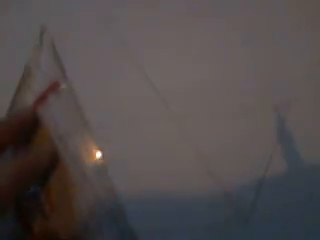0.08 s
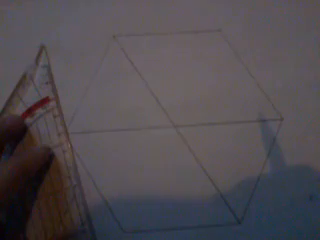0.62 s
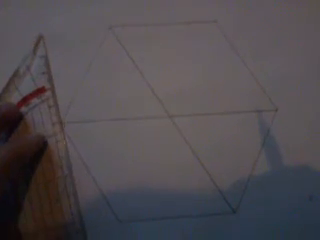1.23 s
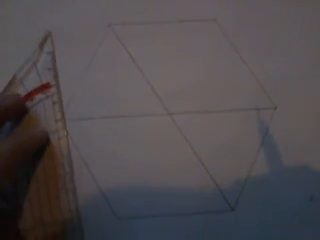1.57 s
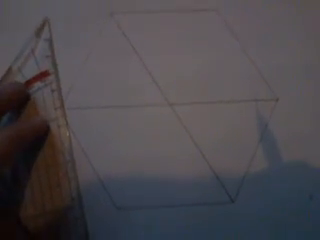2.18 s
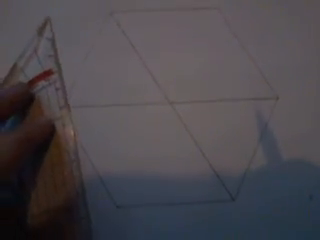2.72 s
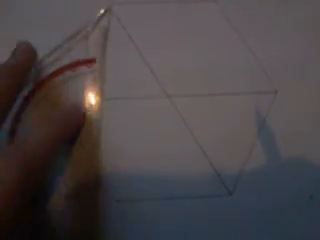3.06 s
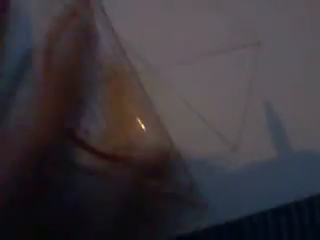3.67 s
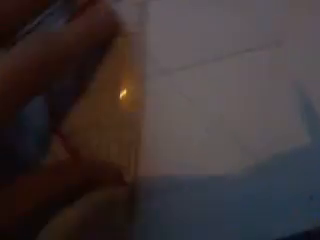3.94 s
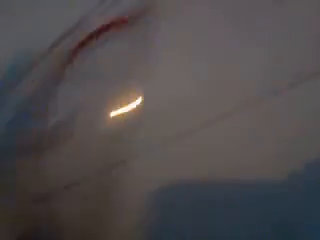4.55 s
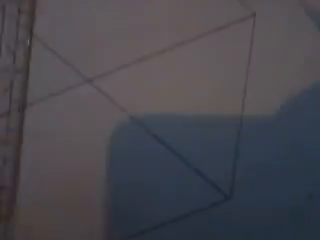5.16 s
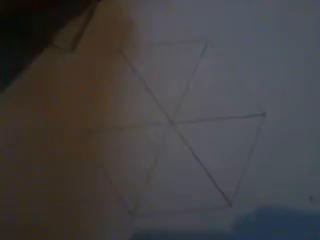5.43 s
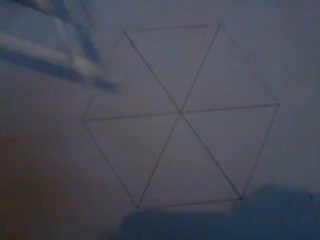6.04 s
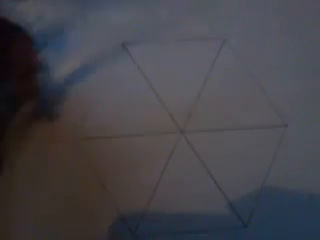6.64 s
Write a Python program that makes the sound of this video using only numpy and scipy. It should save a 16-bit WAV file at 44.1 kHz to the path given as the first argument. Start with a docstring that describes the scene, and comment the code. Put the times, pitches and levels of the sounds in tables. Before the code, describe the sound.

A plastic set square scrapes and slides over paper, with ticks, brief squeaks and a loud rattling knock, over a faint fan.

```python
"""A small fan whirs in a quiet room. Close to a small microphone, a plastic set square slides face down
on paper, rubbing over the fibres and catching with little ticks. At 1.5 s an edge digs in and knocks;
fingers drag on the sheet. Near 3 s a corner squeaks, then the tip squeals as the square is tilted up.
At 5 s it is knocked down, overloads the input and rattles, then skims back on its edge."""
import sys
import numpy as np
from scipy import signal
from scipy.fft import rfft, irfft
from scipy.io import wavfile

SR = 44100
rng = np.random.default_rng(int(sys.argv[2]) if len(sys.argv) > 2 else 0)


def generate_wav(sig):
    """Save sig (samples, or channels by samples) to the path in sys.argv[1] as 16-bit PCM at SR."""
    pcm = np.round(np.clip(np.atleast_2d(sig).T, -1, 1) * 32767).astype(np.int16)
    wavfile.write(sys.argv[1], SR, pcm)


N = 298998
TIME = np.arange(N) / SR


def from_db(db):
    return 10 ** (np.asarray(db) / 20)


def unit_rms(x):
    return x / np.sqrt(np.mean(x ** 2) + 1e-20)


def butter(x, hz, kind, order=2):
    return signal.sosfilt(signal.butter(order, hz, kind, fs=SR, output="sos"), x)


def steep_lowpass(x, hz):
    return signal.sosfilt(signal.ellip(10, .1, 80, hz, fs=SR, output="sos"), x)


def coloured(x, spectrum):
    """Shape x by (freq_hz, gain_db) points, rolled off below the first; rms 1."""
    hz, db = np.transpose(spectrum)
    bins_hz = np.maximum(np.arange(N // 2 + 1) * SR / N, 1)
    low_cut = 1 / (1 + (hz[0] / bins_hz / 2) ** 4)
    gain = from_db(np.interp(np.log(bins_hz), np.log(hz), db))
    return unit_rms(irfft(rfft(x) * low_cut * gain, N))


def resonant(x, modes, alternate=True):
    """Parallel resonators, by default of alternating sign; rms 1."""
    out = 0
    for k, (hz, width_hz, db) in enumerate(modes):
        radius = np.exp(-np.pi * width_hz / SR)
        feedback = [1, -2 * radius * np.cos(2 * np.pi * hz / SR), radius ** 2]
        sign = (-1) ** k if alternate else 1
        out += sign * from_db(db) * signal.lfilter([1 - radius, 0, radius - 1], feedback, x)
    return unit_rms(out)


def drift(rate_hz):
    """Random wander; rms 1."""
    return unit_rms(np.interp(TIME * rate_hz, np.arange(N), rng.standard_normal(N)))


def swell(start_s, rise_s):
    """Contact envelope: peaks at 1 after rise_s, then decays."""
    age = np.clip((TIME - start_s) / rise_s, 0, 20)
    return age * np.exp(1 - age) * (age < 20)


def friction(slips_per_s, spread_db, judder_db):
    """Paper fibres let go in tiny uneven slips, bunched by the judder of the hand."""
    sizes = from_db(spread_db * np.minimum(rng.exponential(1, N), 4)) * rng.standard_normal(N)
    slips = rng.random(N) < slips_per_s / SR
    return sizes * slips * from_db(judder_db * drift(260))


def bursts(events, width, crack_db):
    """Brief clusters of contacts: a broad resonance over a wider crack."""
    out, noise = np.zeros(N), rng.standard_normal(N)
    for start_s, db, hz, rise_s in events:
        span = slice(int(start_s * SR), int((start_s + 20 * rise_s) * SR))
        envelope = swell(start_s, rise_s)[span]
        ring = unit_rms(butter(noise[span], [hz / (1 + width), hz * (1 + width)], "band"))
        crack = unit_rms(butter(noise[span], [hz / 4, min(2 * hz, 7000)], "band", order=3))
        burst = unit_rms(envelope * (ring + from_db(crack_db) * crack))
        out[span] += from_db(db) * burst * np.sqrt(np.mean(envelope ** 2))
    return out


# Room noise: freq_hz, gain_db
ROOM_SPECTRUM = [(20, 15.5), (55, -21), (100, -26), (180, -11.5), (270, -6), (340, 3.5), (460, -0.5),
                 (800, 2), (1050, 1.5), (1400, -2.5), (2600, -3.5), (4500, -3.5), (6300, 0), (7300, -3.5)]


def room_hiss(level_db=-56.5):
    """Steady noise floor."""
    noise = coloured(rng.standard_normal(N), ROOM_SPECTRUM)
    return from_db(level_db) * unit_rms(butter(noise, 8200, "low", order=6))


# Fan tones: pitch_hz, rms_db
FAN_TONES = [(349.9, -82), (780.6, -74), (866.7, -80.5), (952.8, -67.5), (995.9, -75.5), (1039, -65),
             (1125, -72), (1319, -95.5)]


def fan(speed_waver=0.0011):
    """Cooling fan: all tones waver together with its speed."""
    rotor_s = TIME + speed_waver * np.cumsum(drift(7.1)) / SR
    return sum(np.sqrt(2) * from_db(db) * np.sin(2 * np.pi * (hz * rotor_s + rng.random()))
               for hz, db in FAN_TONES)


def reflections(x, wet_db=-30, t60_s=0.24):
    """Desk and nearby walls return a short, faint tail."""
    age_s = TIME[:SR // 3]
    tail = rng.standard_normal(len(age_s)) * from_db(-60 * age_s / t60_s) * (age_s > .003)
    return from_db(wet_db) * signal.fftconvolve(x, tail / np.sqrt(np.sum(tail ** 2)))[:N]


# Desk thuds: start_s, level_db, centre_hz, rise_s
DESK_THUDS = [(.828, -61, 270, 0.0067), (1.075, -62, 222, 0.0033), (1.591, -31, 138, 0.00077),
              (2.64, -44, 347, 0.015), (4.967, -37.5, 366, 0.0032), (4.977, -21, 220, 0.0011),
              (5.2, -35, 346, 0.0026), (5.79, -52.5, 240, 0.0038), (5.865, -52, 282, 0.0082)]


def thuds():
    """The desk's dull answer to a contact."""
    return bursts(DESK_THUDS, width=0.33, crack_db=-43)


# Catches and taps: start_s, level_db, centre_hz
PAPER_TICKS = [(0.3734, -31, 2340), (.409, -31, 2200), (0.4525, -25, 5200), (.693, -39.5, 5260),
               (1.126, -38, 2100), (1.144, -30.5, 1880), (1.163, -38, 2280), (1.478, -38, 4600),
               (1.557, -29.5, 4530), (1.574, -14, 4300), (1.5895, -8.5, 4200), (1.5916, -14, 1900),
               (1.6308, -12.5, 6260), (1.6835, -12, 4300), (2.3586, -36.5, 3740), (2.6356, -13.5, 5820),
               (2.732, -43.5, 5500), (3.5525, -43, 6800), (4.1987, -44, 6260), (4.2372, -42.5, 6060),
               (4.9632, -28.5, 5700), (4.976, -20.5, 5900), (5.1979, -12, 5600), (5.2007, -13, 5700),
               (5.7365, -23, 5540), (5.993, -46.5, 5470), (6.492, -44, 4960), (6.6082, -29, 3360)]


def ticks(rise_s=.0012):
    """Plastic catches on paper, equally fast every time."""
    return bursts([(*tick, rise_s) for tick in PAPER_TICKS], width=0.25, crack_db=-10)


# Landings: start_s, chatter_db, ring_db, chatter_t60_s
LANDINGS = [(4.965, -22, -29.5, 0.11), (4.98, -25, -19, 0.15), (5.203, -25.5, -51, 0.096)]
# Modes of the loose square: pitch_hz, level_db, t60_s
SQUARE_MODES = [(958, -16.5, 0.18), (1460, -8, 0.093), (1685, -3, 0.17), (1917, -10, 0.143),
                (2920, -20, 0.18), (3300, -5, 0.034), (3903, -30.5, 0.25), (4480, -26, 0.25),
                (5140, -22.5, 0.2), (6210, -25, 0.13), (6051, -26, 0.15), (6340, -18.5, 0.268)]


def rattles():
    """After landing, the square rings in its modes and buzzes against the sheet."""
    spectrum_hz_db = [(200, -13), (700, 2.5), (1100, 7.5), (1600, -3.5), (2500, -3), (4000, -1),
                      (6200, 2.5), (7500, 3), (9000, -28.5)]
    chatter = coloured(friction(4600, spread_db=1.65, judder_db=2.01), spectrum_hz_db)
    out = np.zeros(N)
    for start_s, chatter_db, ring_db, chatter_t60_s in LANDINGS:
        start = int(start_s * SR)
        age_s = TIME[:min(SR // 2, N - start)]
        span = slice(start, start + len(age_s))
        ring = sum(from_db(db - 60 * age_s / t60_s) * np.sin(2 * np.pi * (hz * age_s + rng.random()))
                   for hz, db, t60_s in SQUARE_MODES)
        buzz = from_db(chatter_db - 60 * age_s / chatter_t60_s) * chatter[span]
        out[span] += from_db(ring_db) * ring + buzz
    return out


# Blows through the sheet: start_s, level_db, pitch_hz, rise_s
DESK_KNOCKS = [(1.582, -22.5, 1020, 0.0014), (1.5928, -2.5, 746, 0.00096), (2.0597, -27.5, 630, 0.0007),
               (2.0884, -27, 746, 0.00067), (2.385, -25.5, 1000, 0.00023), (2.6369, -30, 460, 0.0019),
               (4.9666, -13.5, 1210, 0.00056), (4.978, 5.5, 1375, 0.00079), (4.99, -17.5, 1130, 0.00069),
               (4.9973, -18.5, 1580, 0.0012), (5.2012, -15.5, 1295, 0.0014), (6.5697, -5.5, 807, 0.00053)]


def knocks(stiffening=0.48):
    """Square and desk give a few damped swings, higher in pitch while the contact is tight."""
    out = np.zeros(N)
    for start_s, db, hz, rise_s in DESK_KNOCKS:
        age_s = np.maximum(TIME - start_s, 0)
        relaxed = 1 - np.exp(-np.minimum(age_s / rise_s, 20))
        cycles = hz * (age_s + stiffening * rise_s * relaxed)
        out -= from_db(db) * swell(start_s, rise_s) * np.sin(2 * np.pi * cycles)
    return out


# Singing of the plate: start_s, end_s, level_db, pitch_hz
SUNG_TONES = [(0.389, 0.482, -29, 5300), (0.49, 0.626, -45.5, 1650), (1.158, 1.294, -50, 2130),
              (5.092, 5.132, -42, 1690), (5.093, 5.128, -43, 1920), (6.038, 6.28, -35.5, 4850)]


def singing(width_hz=230):
    """One narrow resonance of the rubbed plate swells and fades."""
    out, noise = np.zeros(N), rng.standard_normal(N)
    for start_s, end_s, db, hz in SUNG_TONES:
        span = slice(int(start_s * SR), int(end_s * SR))
        tone = resonant(noise[span], [(hz, width_hz, 0)])
        out[span] += from_db(db) * np.sin(np.linspace(0, np.pi, len(tone))) * tone
    return out


def stroke_gains(strokes, swing_db=20, body_share=0.79):
    """Hiss and body gains: strokes gather speed, hold and die away; overlaps add in power."""
    power = np.zeros((2, N))
    for peak_s, attack_s, hold_s, release_s, hiss_db, body_db in strokes:
        end_s = peak_s + hold_s
        span = slice(max(int((peak_s - 3 * attack_s) * SR), 0), int((end_s + 3 * release_s) * SR))
        slowing = np.maximum((peak_s - TIME[span]) / attack_s, (TIME[span] - end_s) / release_s)
        drop_db = swing_db * np.maximum(slowing, 0)
        power[:, span] += from_db([hiss_db - drop_db, body_db - body_share * drop_db]) ** 2
    return np.sqrt(power)


# Plastic resonances in every rub: centre_hz, width_hz, gain_db
PLATE_MODES = [(3360, 55, -14), (3906, 12, 1), (4390, 92, -1), (4560, 81, -2), (4770, 24, -4.5),
               (4994, 79, -1), (5770, 24, -7.5), (6650, 21, 2), (6600, 22, -2), (6920, 79, 5.5)]


def rub(strokes, grain, hiss_trim_db, body_trim_db, plate_db, split_hz=3000):
    """Speed brings out the fibres' hiss, weight the sheet's body; the plastic rings along."""
    hiss_gain, body_gain = stroke_gains(strokes)
    plate = from_db(plate_db) * resonant(grain, PLATE_MODES, alternate=False)
    rubbing = butter(grain + plate, 7500, "low", order=8)
    hiss = unit_rms(butter(rubbing, split_hz, "high", order=6))
    body = unit_rms(butter(rubbing, split_hz, "low", order=6))
    return from_db(hiss_trim_db) * hiss_gain * hiss - from_db(body_trim_db) * body_gain * body


# Finger strokes: peak_s, attack_s, hold_s, release_s, hiss_db, body_db
FINGER_STROKES = [(1.765, 0.0088, 0.0074, 0.036, -28, -36.5), (1.79, 0.026, 0.026, .012, -49, -39),
                  (1.95, 0.06, .02, .08, -58.5, -57), (2.059, 0.012, 0.01, 0.036, -46.5, -35),
                  (2.083, 0.026, .018, 0.019, -45.5, -40.5), (2.205, .05, 0.0069, 0.038, -50.5, -47),
                  (2.334, 0.04, 0.015, 0.032, -46.5, -46.5), (2.384, 0.0044, 0.0024, 0.0057, -48, -38.5)]
# Skin on paper: freq_hz, gain_db
FINGER_SPECTRUM = [(200, -20.5), (330, 2), (480, 9), (880, 7), (1150, 3), (1750, -0.5), (2200, 4),
                   (2900, -12), (3500, -11), (4400, -13), (5000, -14.5), (5350, -14), (5800, -18),
                   (6800, -25)]


def finger_drag():
    """Fingertips drag on the sheet: coarse, dull grain."""
    grain = coloured(friction(6000, spread_db=1.4, judder_db=1.9), FINGER_SPECTRUM)
    return rub(FINGER_STROKES, grain, hiss_trim_db=0, body_trim_db=-0.5, plate_db=-24)


# Corner strokes: peak_s, attack_s, hold_s, release_s, hiss_db, body_db
CORNER_STROKES = [(2.87, 0.11, .01, .05, -48, -75), (2.912, 0.039, .004, .012, -33.5, -48),
                  (2.935, 0.0069, 0.0039, 0.024, -26, -45), (3.06, 0.065, .006, 0.088, -46, -64),
                  (3.163, .016, 0.0025, 0.03, -34, -51.5)]
# Corner resonances: centre_hz, width_hz, gain_db
CORNER_MODES = [(1000, 120, -14), (1565, 190, -12), (2400, 260, -16.5), (4260, 430, -15), (4860, 170, 3.5),
                (5230, 510, -1), (5930, 140, 1.5), (6570, 460, -5)]


def corner_squeak():
    """A corner sticks and slips, driving its resonances."""
    grain = resonant(friction(9000, spread_db=0.94, judder_db=2.1), CORNER_MODES)
    return rub(CORNER_STROKES, grain, hiss_trim_db=-1.5, body_trim_db=-1, plate_db=-18)


# Tip strokes: peak_s, attack_s, hold_s, release_s, hiss_db, body_db
TIP_STROKES = [(3.52, 0.018, 0.0097, 0.0097, -49.5, -60), (3.558, 0.0079, .012, .03, -47, -61),
               (3.588, 0.015, 0.003, 0.018, -24.5, -47)]
# Tip resonances: centre_hz, width_hz, gain_db
TIP_MODES = [(990, 620, -18), (2050, 330, -13), (3950, 140, -11.5), (4430, 170, -11), (5570, 350, -8.5),
             (6140, 130, -7), (6740, 125, 5)]


def tip_squeal():
    """The sharp tip squeals as the square tilts up."""
    grain = resonant(friction(9000, spread_db=1.6, judder_db=1.4), TIP_MODES)
    return rub(TIP_STROKES, grain, hiss_trim_db=0.6, body_trim_db=-1.5, plate_db=-13)


# Light face strokes: peak_s, attack_s, hold_s, release_s, hiss_db, body_db
DRAG_STROKES = [(.5, 0.046, 0.08, 0.11, -56, -51), (.618, 0.036, 0.0037, .02, -44.5, -47),
                (.932, .025, 0.016, 0.13, -39.5, -49.5), (1.045, 0.022, 0.013, 0.032, -34.5, -45),
                (1.09, 0.017, 0.016, 0.034, -43, -46.5), (1.168, 0.011, 0.07, 0.065, -46.5, -50),
                (1.296, 0.013, 0.0094, 0.026, -30, -44.5), (1.33, .04, 0.013, 0.087, -42.5, -45.5),
                (5.06, .05, 0.027, .04, -45, -52), (5.098, 0.026, 0.0096, 0.03, -35.5, -49)]
# Light face on paper: freq_hz, gain_db
DRAG_SPECTRUM = [(220, -36.5), (380, -14), (650, -15.5), (1050, -8), (1350, -6), (1650, -9.5), (2130, -3),
                 (2700, -10.5), (3400, -4), (4200, 3.5), (4750, 11), (5400, 4.5), (6300, 3), (7000, 8)]


def face_drag():
    """The face drags lightly; the hollow under it hums along."""
    grain = coloured(friction(16000, spread_db=0.88, judder_db=0.8), DRAG_SPECTRUM)
    return rub(DRAG_STROKES, grain, hiss_trim_db=-2.5, body_trim_db=1, plate_db=-22.5)


# Flat face strokes: peak_s, attack_s, hold_s, release_s, hiss_db, body_db
FACE_STROKES = [(.03, 0.23, 0.15, .03, -56.5, -59), (.204, 0.0089, 0.0093, 0.078, -39.5, -52.5),
                (.22, .02, .04, 0.36, -47, -53), (.375, 0.066, 0.016, .05, -34.5, -49),
                (.415, 0.05, 0.039, 0.067, -30, -34), (.695, 0.016, 0.0012, 0.073, -41.5, -45.5),
                (.828, 0.03, 0.0048, 0.017, -31, -39), (.855, .02, 0.00064, 0.1, -45, -48)]
# Flat face on paper: freq_hz, gain_db
FACE_SPECTRUM = [(220, -34), (400, -7), (530, -15), (800, -7), (1300, -1), (1700, -2), (2100, 0),
                 (3200, -9.5), (4250, -1.5), (4750, -4.5), (5270, -3.5), (5750, -6), (6300, -11.5),
                 (7300, -16)]


def face_slide():
    """The flat face slides under the hand: even grain."""
    grain = coloured(friction(14000, spread_db=0.78, judder_db=0.72), FACE_SPECTRUM)
    return rub(FACE_STROKES, grain, hiss_trim_db=-1.5, body_trim_db=-1, plate_db=-16)


# Light edge strokes: peak_s, attack_s, hold_s, release_s, hiss_db, body_db
SKIM_STROKES = [(2.442, 0.0055, 0.0022, 0.017, -36, -43.5), (2.505, 0.091, 0.047, .03, -31.5, -42.5),
                (2.582, 0.036, 0.0085, 0.026, -27, -37), (2.608, 0.037, 0.013, 0.016, -24, -44),
                (2.645, 0.012, 0.0067, 0.039, -33, -40), (3.28, .012, 0.0066, 0.022, -50, -60),
                (3.778, 0.03, 0.026, .012, -39.5, -58), (3.84, 0.4, 0.14, .1, -56, -65.5),
                (4.565, 0.032, .008, 0.047, -44, -65), (4.73, .12, .05, .08, -53.5, -63),
                (4.905, 0.046, 0.065, .02, -50, -59), (5.155, 0.067, .025, .04, -34.5, -49),
                (5.738, 0.0064, 0.0035, 0.042, -34, -42), (5.76, 0.058, 0.017, .07, -35, -56),
                (5.866, 0.046, 0.016, 0.035, -33, -47.5), (5.92, 0.035, .03, 0.055, -51.5, -57.5),
                (6.065, 0.044, 0.18, 0.051, -35.5, -51.5), (6.125, 0.068, 0.044, 0.074, -32.5, -53.5),
                (6.308, 0.027, 0.0051, 0.029, -44, -59), (6.374, 0.051, 0.009, 0.06, -39.5, -57.5),
                (6.467, 0.0058, 0.0052, 0.007, -43, -47.5), (6.53, 0.009, 0.0064, 0.014, -54, -50),
                (6.562, 0.0033, .02, 0.0045, -37, -36.5), (6.609, 0.0026, 0.0027, 0.016, -39, -40.5),
                (6.625, .012, 0.07, 0.15, -43, -49)]
# Light edge on paper: freq_hz, gain_db
SKIM_SPECTRUM = [(170, -41.5), (320, -18), (550, -22), (1000, -13), (1550, -12), (1900, -16), (2400, -15),
                 (2800, -16.5), (3800, -9), (4500, -6.5), (4900, -0.5), (5350, 0.5), (5900, 2.5),
                 (7000, -1.5)]


def edge_skim():
    """An edge skims the fibres: fine, bright grain."""
    grain = coloured(friction(18000, spread_db=0.61, judder_db=1.6), SKIM_SPECTRUM)
    return rub(SKIM_STROKES, grain, hiss_trim_db=-0.83, body_trim_db=-2, plate_db=-15.5)


# Hard edge strokes: peak_s, attack_s, hold_s, release_s, hiss_db, body_db
SCRAPE_STROKES = [(1.485, .04, 0.013, 0.026, -41.5, -45.5), (1.52, .03, 0.033, 0.0082, -42, -43),
                  (1.576, .007, .06, 0.049, -19.5, -32.5), (1.652, .015, .034, .02, -17.5, -34),
                  (1.7, .02, .02, 0.024, -28.5, -43.5), (1.74, .015, .012, 0.0092, -26.5, -29)]
# Hard edge on paper: freq_hz, gain_db
SCRAPE_SPECTRUM = [(200, -42), (500, -18), (750, -15.5), (950, -13), (1200, -15), (2300, -18.5),
                   (2900, -12), (3400, -6), (4000, -4), (4700, 2), (5300, -9), (6200, -4), (6900, -2.5),
                   (7600, -0.5)]


def edge_scrape():
    """An edge pressed hard into the paper: dense, juddering grain."""
    grain = coloured(friction(20000, spread_db=0.66, judder_db=2.25), SCRAPE_SPECTRUM)
    return rub(SCRAPE_STROKES, grain, hiss_trim_db=0.5, body_trim_db=-2.5, plate_db=-22)


def scene(mic_bass_hz=192):
    """Blows and rubbing on the desk, over fan and room; mono."""
    blows = ticks() + thuds() + rattles() + butter(knocks(), mic_bass_hz, "high", order=4)
    rubs = face_slide() + face_drag() + edge_scrape() + edge_skim() + finger_drag()
    squeaks = corner_squeak() + tip_squeal() + singing()
    desk = blows + rubs + squeaks
    return (desk + reflections(desk) + fan() + room_hiss())[None]


def record(dry, band_top_hz=7140, mirror_hz=8000, overload=0.76, cutoff_hz=15800):
    """Narrow-band recorder: the treble ends near 7 kHz, and a faint mirror of it shows above 8 kHz; the hardest
    knocks clip."""
    narrow = signal.fftconvolve(dry, signal.firwin(101, band_top_hz, fs=SR)[None], "same")
    carrier = 2 * np.cos(2 * np.pi * 2 * mirror_hz * TIME)
    mirror = from_db(-32.5) * steep_lowpass(narrow * carrier, hz=8950)
    return steep_lowpass(np.clip(narrow + mirror, -overload, overload), cutoff_hz)


dry = scene()
out = record(dry)
generate_wav(out)
```